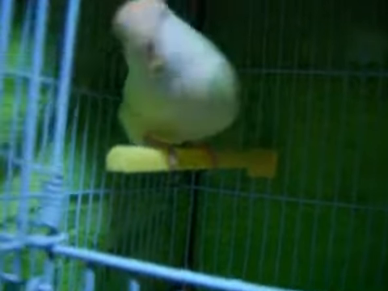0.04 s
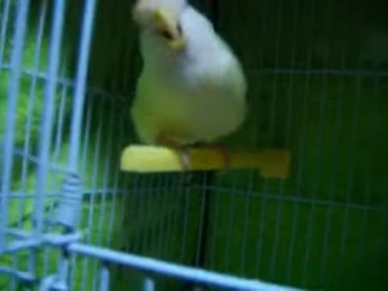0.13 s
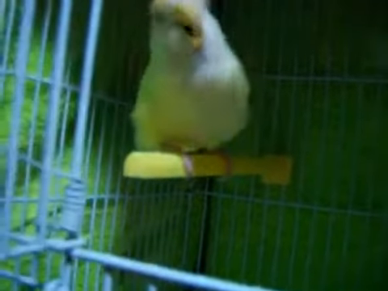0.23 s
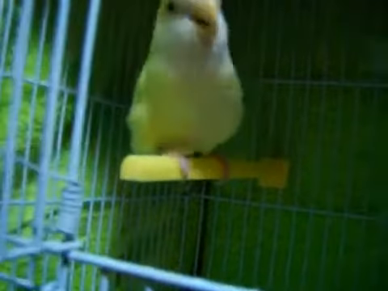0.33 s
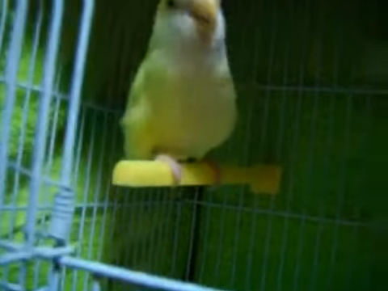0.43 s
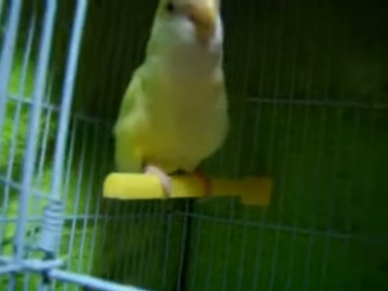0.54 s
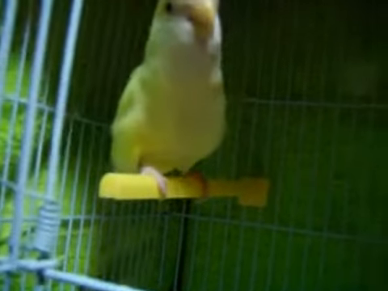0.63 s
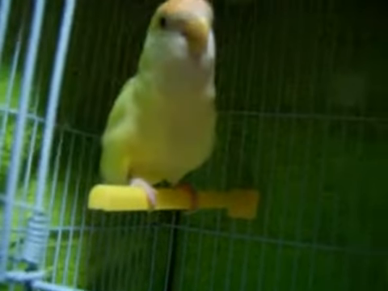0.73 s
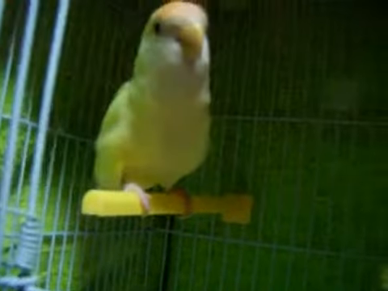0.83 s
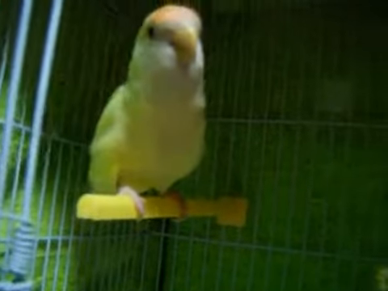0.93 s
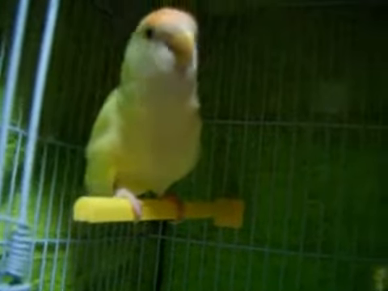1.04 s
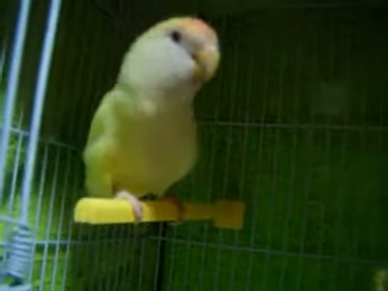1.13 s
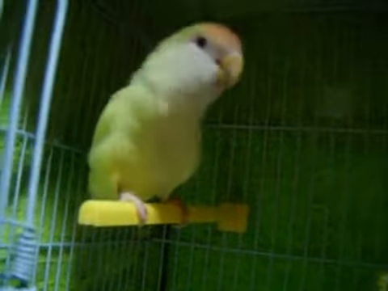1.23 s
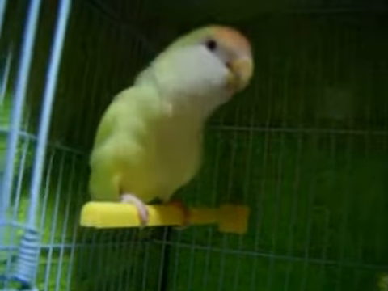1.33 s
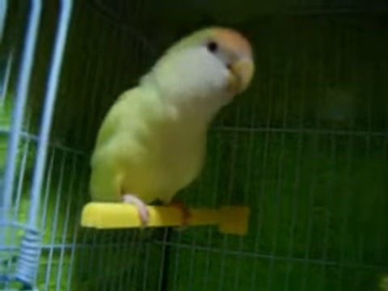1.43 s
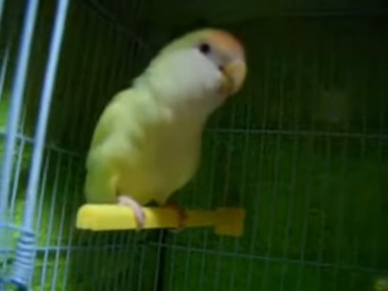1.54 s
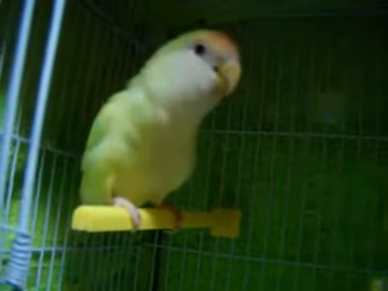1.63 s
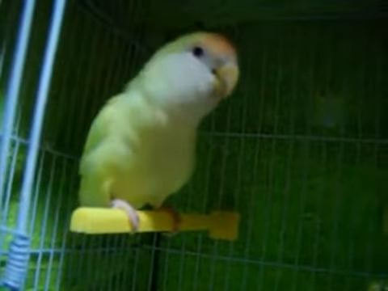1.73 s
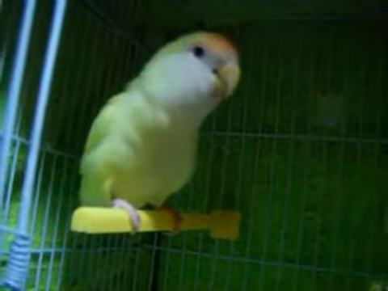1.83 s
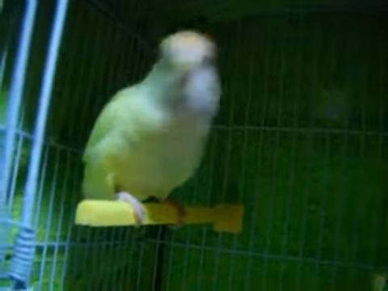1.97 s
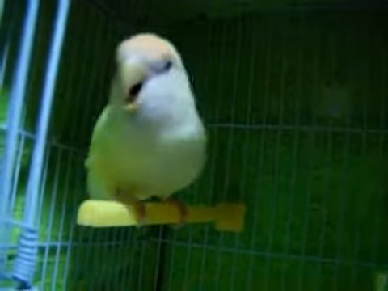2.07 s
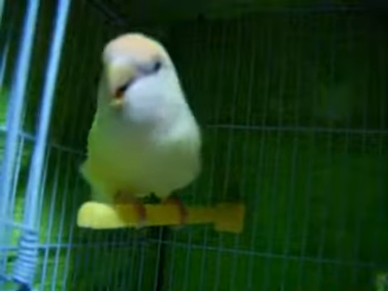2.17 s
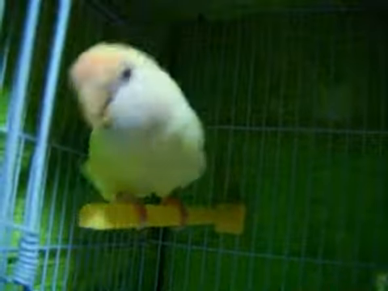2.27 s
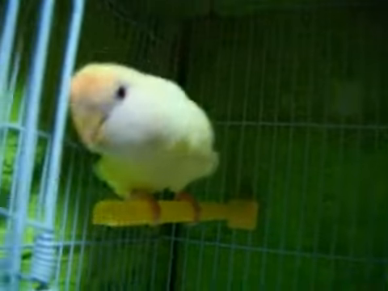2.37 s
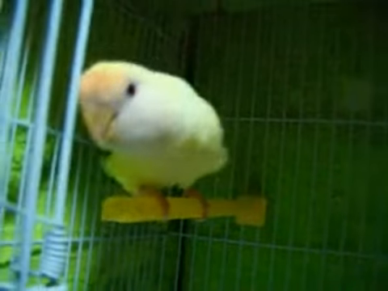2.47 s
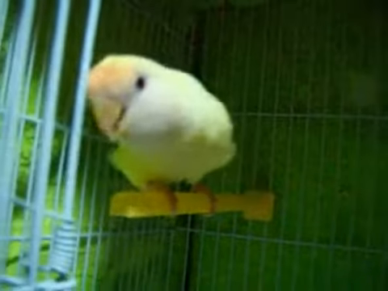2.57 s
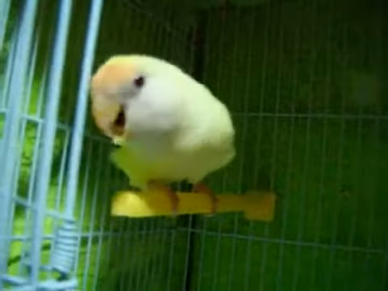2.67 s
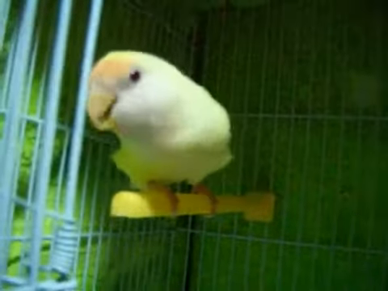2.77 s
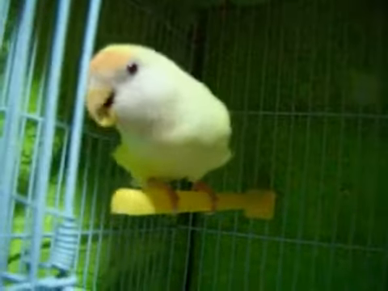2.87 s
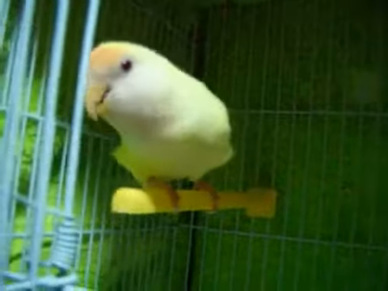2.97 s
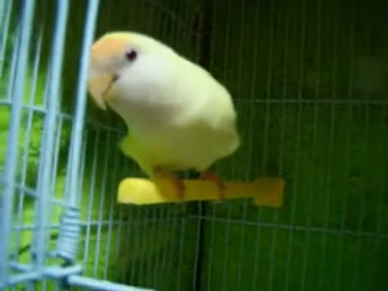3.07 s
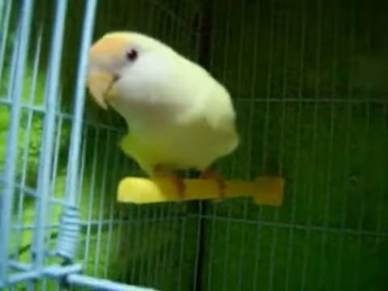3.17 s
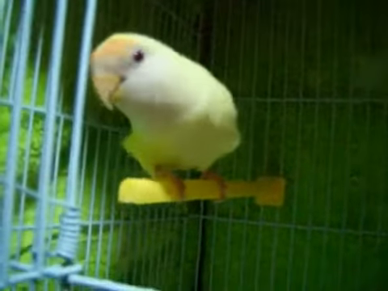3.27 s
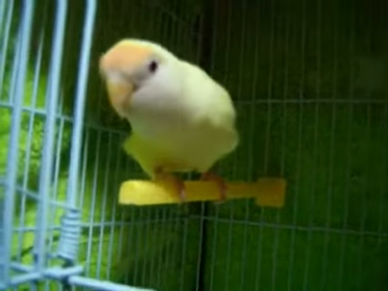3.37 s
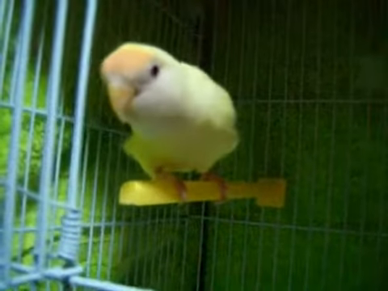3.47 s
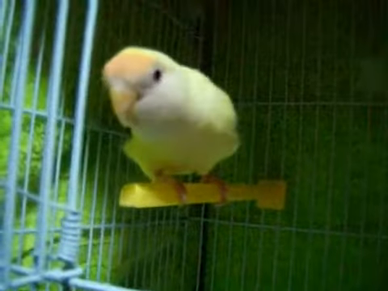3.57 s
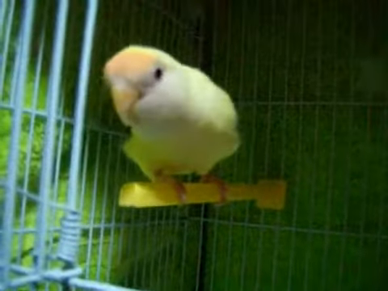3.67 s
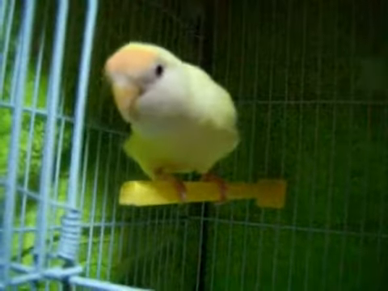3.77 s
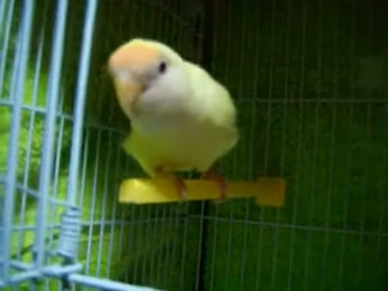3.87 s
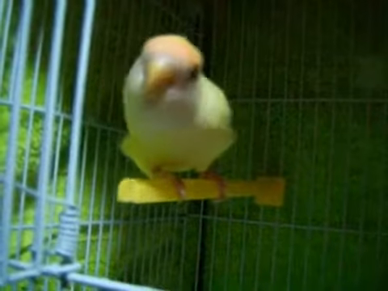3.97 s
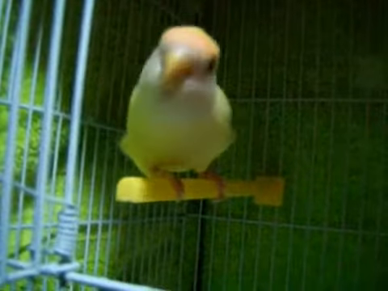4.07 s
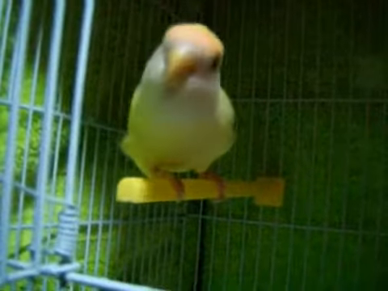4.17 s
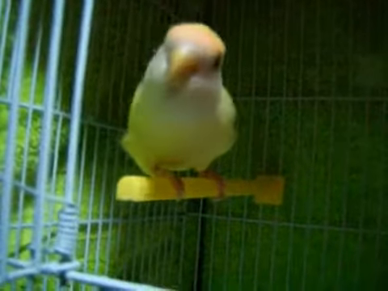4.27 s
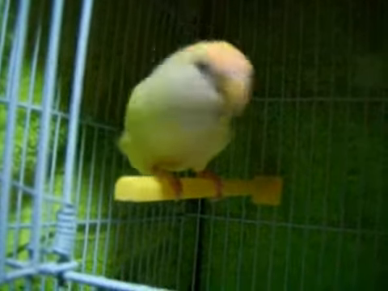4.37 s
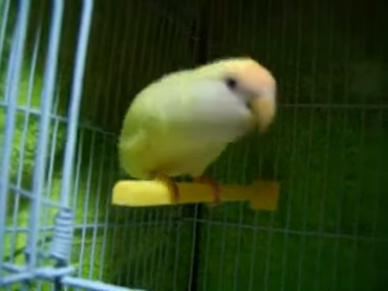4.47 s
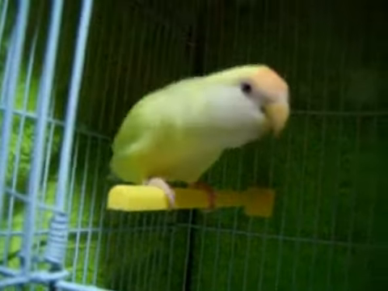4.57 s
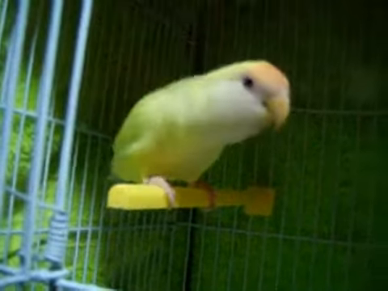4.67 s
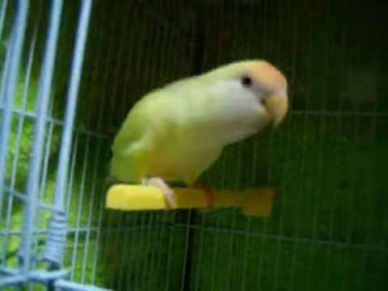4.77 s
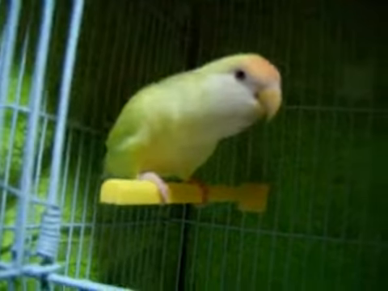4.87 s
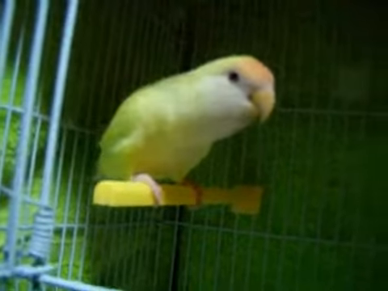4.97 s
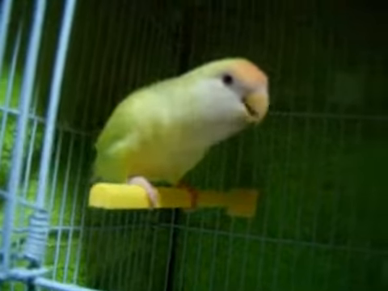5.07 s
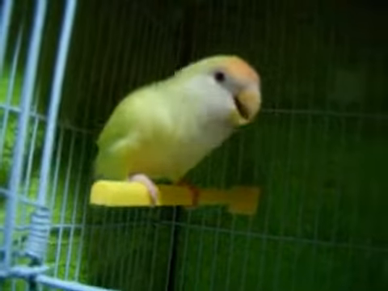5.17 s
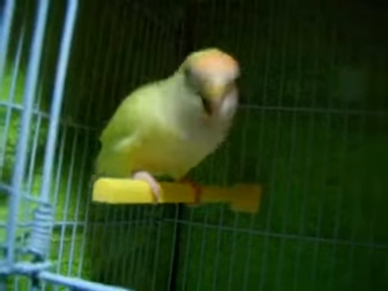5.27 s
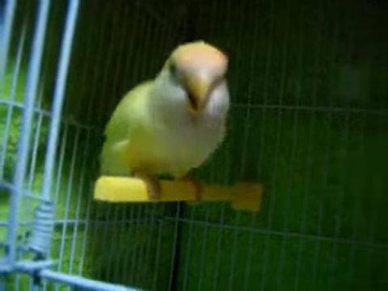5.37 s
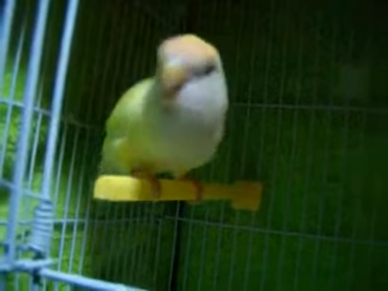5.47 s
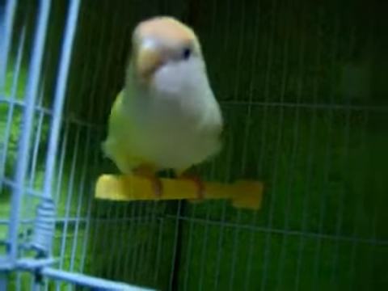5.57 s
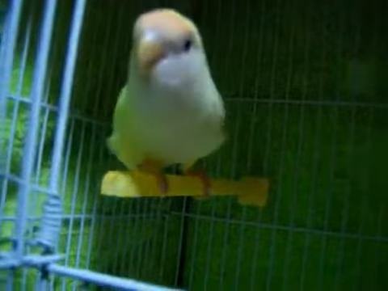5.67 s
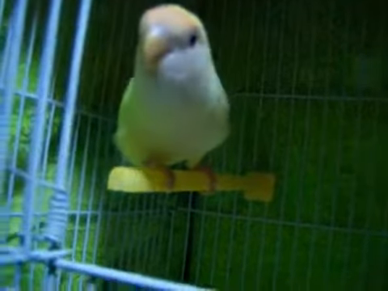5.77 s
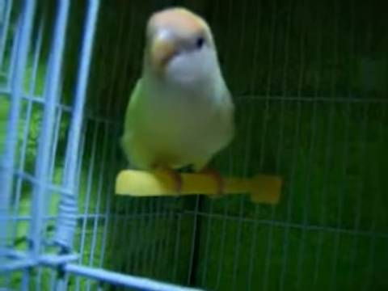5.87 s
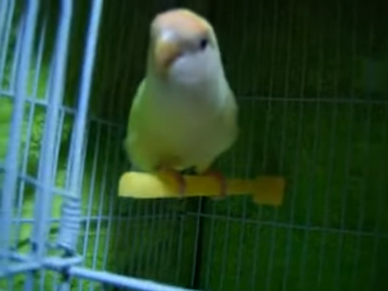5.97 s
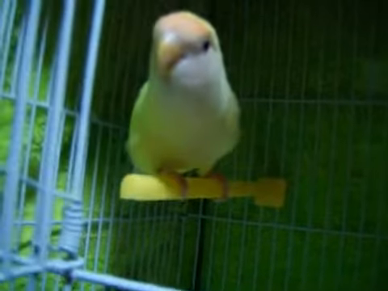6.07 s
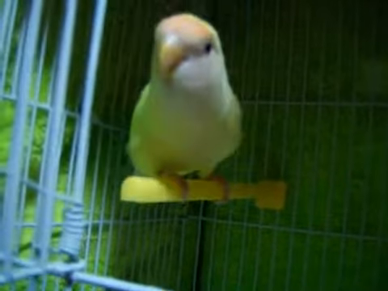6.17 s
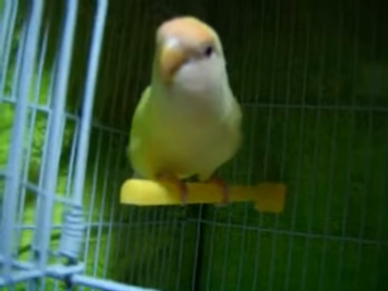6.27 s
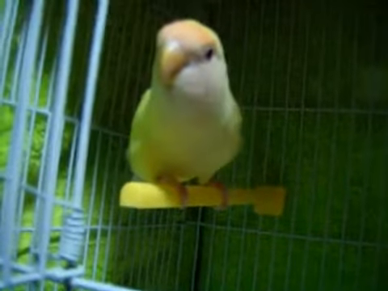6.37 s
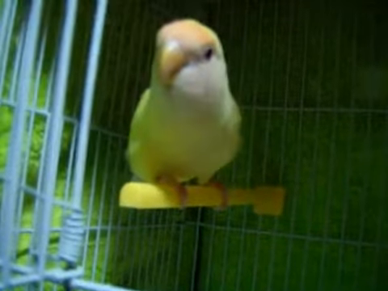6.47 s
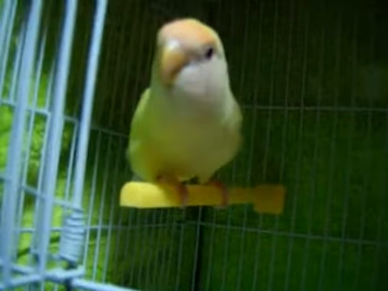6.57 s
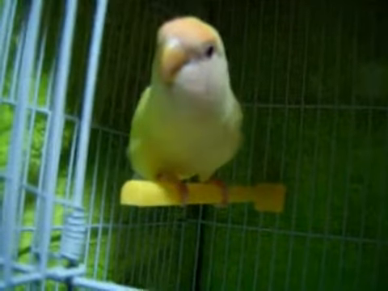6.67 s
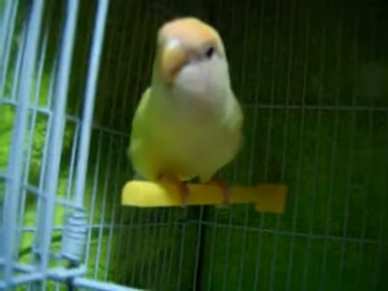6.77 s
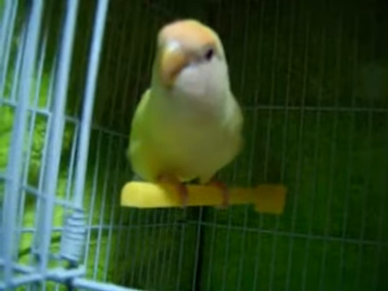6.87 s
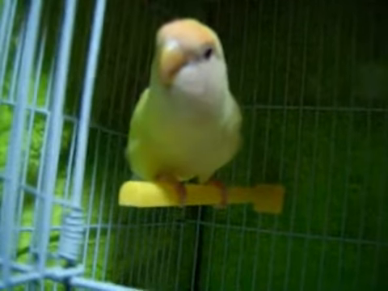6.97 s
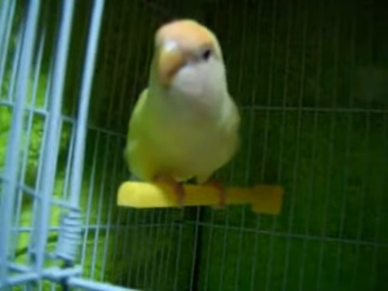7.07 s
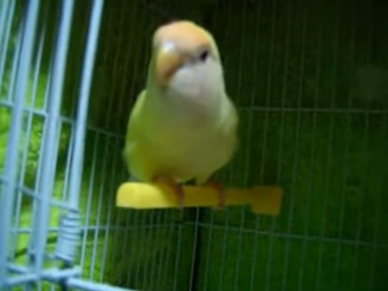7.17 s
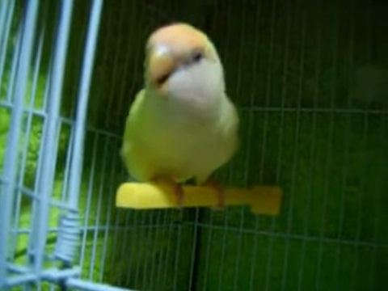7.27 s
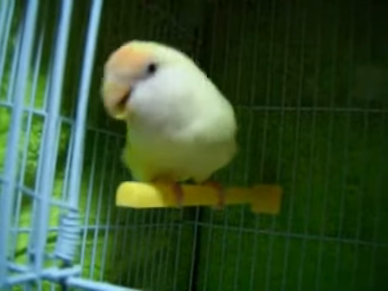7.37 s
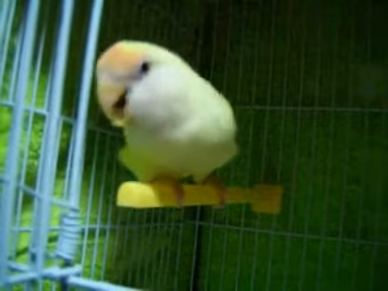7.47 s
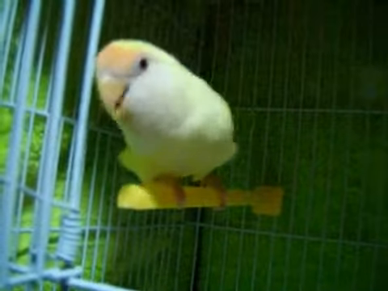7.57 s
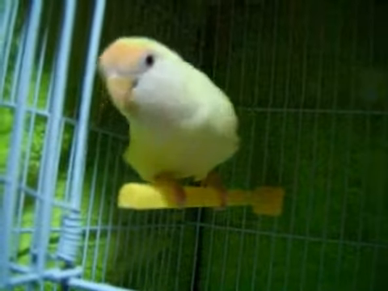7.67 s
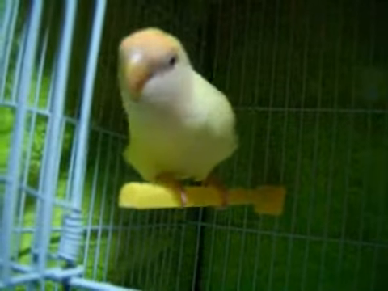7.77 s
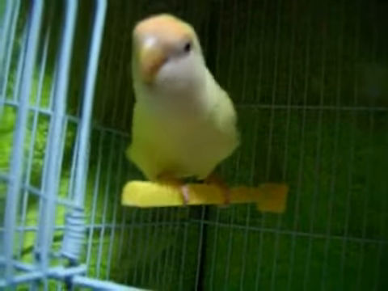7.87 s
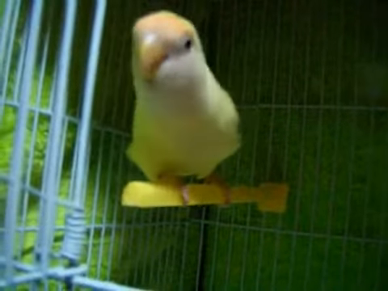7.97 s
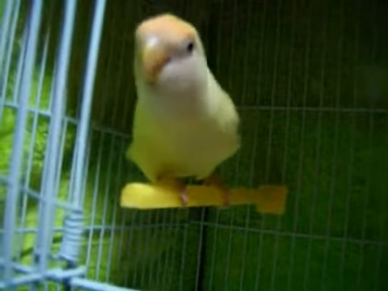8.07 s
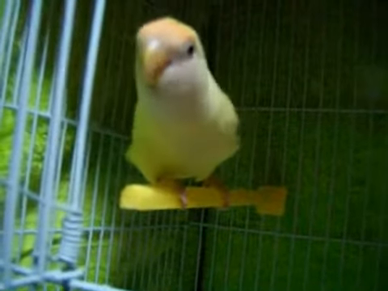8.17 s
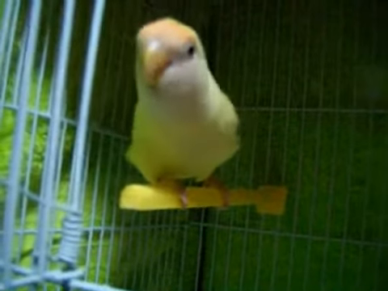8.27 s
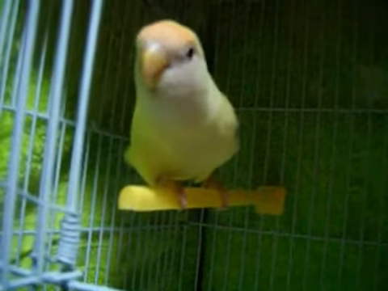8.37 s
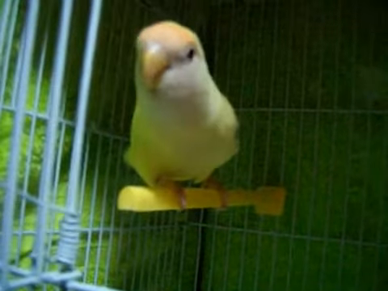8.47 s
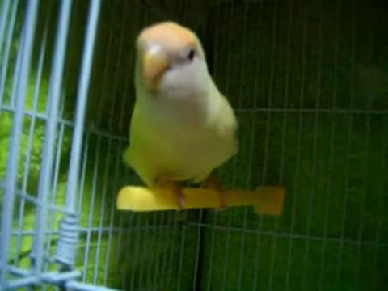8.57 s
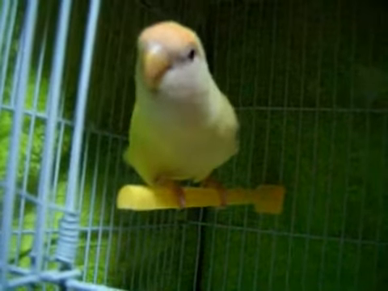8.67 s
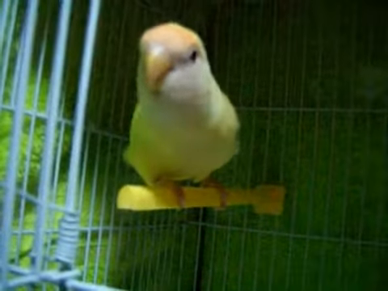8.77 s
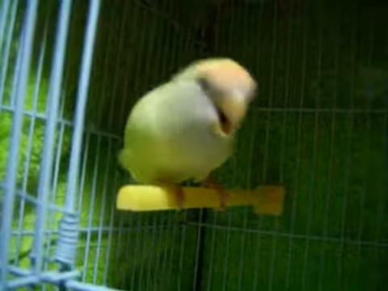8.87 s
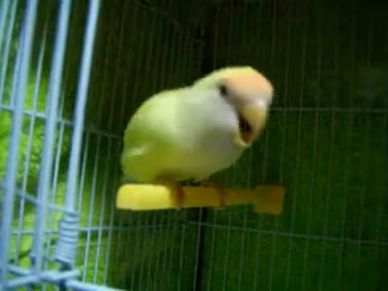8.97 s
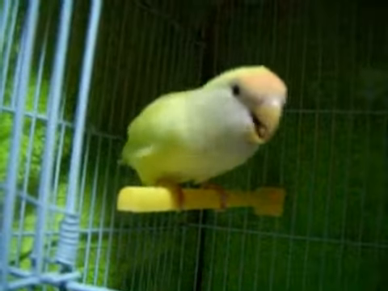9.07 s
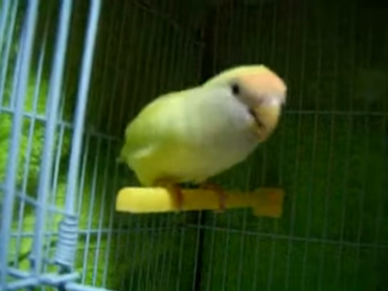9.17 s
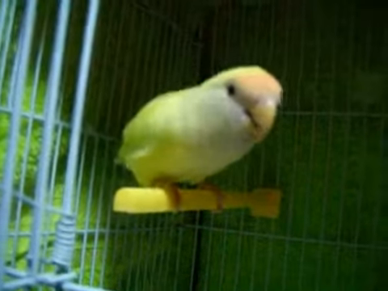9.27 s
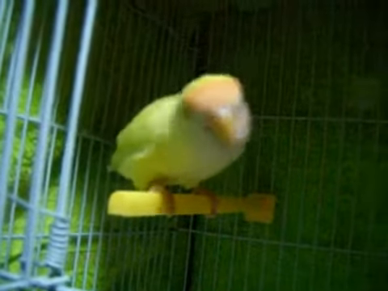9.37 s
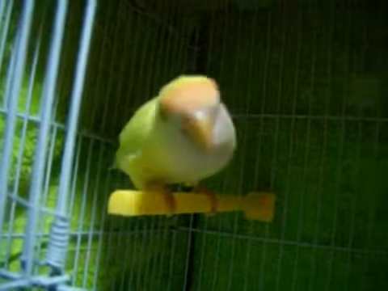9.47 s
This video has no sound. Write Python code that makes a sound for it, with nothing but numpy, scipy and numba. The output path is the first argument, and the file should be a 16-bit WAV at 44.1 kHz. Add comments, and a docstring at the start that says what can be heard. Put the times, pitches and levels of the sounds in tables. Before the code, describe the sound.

A small parrot gives loud, shrill, raspy screeches right by the microphone, often in quick doubles, while other birds answer faintly in a small room.

```python
"""A small parrot screeches a hand's breadth from a cheap microphone indoors: each screech is a chain of short
whistled notes that jump in pitch, joined by raspy breaks. A wavering tone with overtones makes each voice.
Two other birds answer from further off, blurred by echoes, and faint taps sound on the cage.
Under it lie shaped noise as microphone hiss, two thin electronic whines (sines) and one electrical pop.
The microphone cuts the treble steeply and a hard ceiling flattens the highest peaks."""
import sys
import numpy as np
from scipy import signal
from scipy.fft import rfft, irfft
from scipy.io import wavfile
from scipy.ndimage import uniform_filter1d
from numba import njit

SR = 44100
rng = np.random.default_rng(int(sys.argv[2]) if len(sys.argv) > 2 else 0)


def volts_from_db(level):
    """Convert decibel levels to linear amplitude ratios."""
    exponent = np.asarray(level, float) / 20
    return 10 ** exponent


def file_out(sig):
    """Save sig as 16-bit WAV at sys.argv[1]."""
    # one column per channel
    cols = np.atleast_2d(sig).T
    # limit, then scale
    lim = np.clip(cols, -1, 1)
    pcm = np.round(lim * 32767).astype(np.int16)
    wavfile.write(sys.argv[1], SR, pcm)


N = 419391  # length in samples
TOP_HZ = 10860  # the microphone passes nothing much above this

# The near bird's screeches, one line each; a syllable lasts until the next, the last entry is the end time [s]:
# (time [s], syllable, start pitch [Hz], level [dB])
SCREECH_SYLLABLES = [ ((0.0, "rise", 2550, -8), (.027, "sag", 4580, -5.5), (.037, "hoarse", 6280, -15.5),
                     (.044, "plunge", 6500, -18.5), (.049, "hold", 3620, -22.5), (.089, "sag", 5270, -22),
                     (.096, "hoarse", 3250, -20), .108), ((.137, "scoop", 2050, -14),
                     (.146, "rise", 4150, -7), (.165, "up", 5900, -18), (.171, "plunge", 5500, -21.5),
                     (.177, "low", 2340, -17), (.217, "hoarse", 3910, -19.5), (.227, "drop", 6200, -12.5),
                     (.236, "plunge", 4500, -25), .246), ((1.927, "fall", 2270, -16),
                     (1.945, "fall", 1990, -29.5), (1.962, "scoop", 1550, -27), (1.974, "rise", 2400, -10),
                     (2.018, "rise", 2600, -10), (2.028, "up", 4170, -9.5), (2.042, "sag", 4530, -10),
                     (2.056, "fall", 4170, -14), (2.075, "hold", 3620, -12), 2.121),
                     ((2.577, "up", 4070, -19), (2.6, "low", 2446, -9), (2.631, "hoarse", 4120, -14.5),
                     (2.638, "up", 5360, -11.5), (2.645, "drop", 6080, -10.5), (2.653, "hold", 3510, -15),
                     (2.695, "sag", 5090, -16.5), (2.702, "fall", 3160, -12), 2.711),
                     ((2.74, "scoop", 2000, -15.5), (2.747, "hold", 4000, -11), (2.77, "plunge", 5650, -16),
                     (2.78, "low", 2330, -12), (2.82, "sag", 3900, -15.5), (2.834, "drop", 5630, -14),
                     (2.849, "fall", 3260, -15.5), 2.856), ((5.073, "scoop", 1900, -19),
                     (5.081, "leap", 4100, -8), (5.094, "hoarse", 4400, -19), (5.107, "hold", 5830, -15.5),
                     (5.124, "hoarse", 3570, -29), (5.142, "low", 3580, -18), (5.155, "leap", 4100, -12),
                     (5.163, "drop", 5050, -18), 5.175), ((5.2, "scoop", 1930, -15.5),
                     (5.213, "hold", 3900, -14), (5.225, "fall", 3560, -12), (5.25, "up", 3230, -15.5),
                     (5.27, "up", 3700, -23.5), (5.279, "hold", 4110, -9.5), (5.297, "fall", 3810, -13),
                     (5.321, "hold", 2260, -15), (5.352, "rise", 3330, -14.5), 5.392),
                     ((7.227, "sag", 4630, -15.5), (7.239, "fall", 2640, -10.5),
                     (7.262, "hoarse", 2790, -12), (7.275, "sag", 4320, -13), (7.292, "up", 5550, -12.5),
                     (7.302, "sag", 5800, -12), (7.313, "hold", 3590, -12), (7.344, "drop", 5700, -13.5),
                     (7.352, "hoarse", 3120, -12.5), 7.362), ((7.391, "scoop", 1920, -15.5),
                     (7.4, "rise", 4060, -9), (7.415, "up", 5300, -8.5), (7.422, "drop", 5950, -10.5),
                     (7.43, "hoarse", 3650, -17.5), (7.444, "low", 2280, -11), (7.466, "hold", 3790, -13.5),
                     (7.483, "up", 5270, -12.5), (7.489, "sag", 5580, -12.5), (7.497, "fall", 3320, -16.5),
                     7.502), ((8.798, "dip", 2350, -18), (8.822, "rise", 1770, -26),
                     (8.845, "scoop", 1600, -18.5), (8.851, "rise", 2370, -13.5),
                     (8.886, "low", 2480, -12.5), (8.901, "hoarse", 4410, -10.5),
                     (8.927, "fall", 4220, -12.5), (8.946, "fall", 3770, -12.5), (8.965, "drop", 5330, -18),
                     (8.983, "hold", 3500, -19.5), 8.998), ]


def near_parrot():
    """The main bird: chains of syllables sung by a mostly clear voice."""
    control = notes(SCREECH_SYLLABLES, dip_db=-3.5, edge_s=0.0031)
    return voice(control, tilt_db=-1.6, dulling=0.022, jitter=.027, spread_hz=720.0,
                 half_db=-10.5, breath_db=-7.0, flutter_db=1.7)


# How each syllable of the near bird moves, from clear whistles through husky notes to raspy breaks:
# name: (end pitch / start pitch, rasp share [dB])
SYLLABLE_SHAPES = { "low": (1.17, -23.5), "rise": (1.07, -22), "hold": (.96, -22), "fall": (.89, -20),
                   "dip": (.76, -20), "scoop": (1.5, -12), "hoarse": (1.01, -10), "sag": (.91, -8),
                   "up": (1.09, -5), "leap": (1.6, -7), "drop": (.81, -6), "plunge": (.64, -7), }
# after each screech a faint tone lingers and fades near 3.6 kHz
TRAIL_HZ, TRAIL_DB, TRAIL_DB_PER_S, TRAIL_RASP_DB, TRAIL_S = 3600, -33, -250, -12, .08
ACCENT_DB = 1.2  # each syllable starts this much above its level and ends as much below
SAG_POWER = 1.8  # how much the low register's glides are bent


def notes(calls, dip_db, edge_s):
    """Pitch, gain and rasp of syllable chains: the pitch breaks at each join and the level dips there."""
    hz, gain, rasp_db = np.full(N, 1. * calls[0][0][2]), np.zeros(N), np.zeros(N)
    trail_t = np.arange(int(TRAIL_S * SR)) / SR
    for call in calls:
        ends = [row[0] for row in call[1:-1]] + [call[-1]]
        for (s, name, from_hz, db), until in zip(call, ends):
            glide, share_db = SYLLABLE_SHAPES[name]
            to_hz = glide * from_hz
            a, b = int(s * SR), int(until * SR)
            hz[a:], rasp_db[a:] = to_hz, share_db
            # notes of the low register sag: they rise late and fall early
            low = max(from_hz, to_hz) < 3300
            bend = SAG_POWER ** np.sign(to_hz - from_hz) if low else 1
            hz[a:b] = from_hz + (to_hz - from_hz) * np.linspace(0, 1, b - a) ** bend
            along = np.linspace(-1, 1, b - a)
            gain[a:b] = volts_from_db(db + dip_db * along ** 4 - ACCENT_DB * along)
        hz[b:], rasp_db[b:] = TRAIL_HZ, TRAIL_RASP_DB
        gain[b:b + len(trail_t)] = volts_from_db(TRAIL_DB + TRAIL_DB_PER_S * trail_t)
    return hz, slur(gain, edge_s), rasp_db


# Windpipe and beak make some pitches louder than others: (frequency [Hz], relative level [dB])
THROAT_RESPONSE = [(1500, -18.5), (2400, -8.5), (3400, 2), (5000, 0.5), (6200, 2), (7400, -9.5),
                   (9000, -12), (11000, -20)]


def voice(control, tilt_db, dulling, jitter, spread_hz, half_db, breath_db, flutter_db):
    """A membrane tone with overtones; where it rasps the cycles scatter, period doubling and air noise join in."""
    hz, gain, rasp_db = control
    rasp = volts_from_db(np.minimum(rasp_db, 0)) ** 2  # share of the power, 0 to 1
    # a gentle, clear call is poorer in overtones than a forced one; the tilt is in dB per octave
    tilt_db = tilt_db + dulling * rasp_db
    shaky_hz = hz * (1 + jitter * rasp ** .25 * wobble(160.))
    phase = 2 * np.pi * np.cumsum(shaky_hz) / SR
    scatter = wobble(spread_hz) + 1j * wobble(spread_hz)
    doubling = wobble(150.0)
    tone, power = 0, 0
    for k in range(1, 6):
        audible = k * hz < 1.1 * TOP_HZ
        partial_gain = volts_from_db(on_log(k * hz, THROAT_RESPONSE) + tilt_db * np.log2(k)) * audible
        # scattered cycles smear each partial into a band, the upper ones more
        share = 1 - (1 - rasp) ** k
        blur = np.sqrt(1 - share) + np.sqrt(share / 2) * np.roll(scatter, 999 * k)
        # each partial also flickers on its own as the beak moves
        blur = blur * volts_from_db(.7 * k * np.roll(doubling, 777 * k))
        tone = tone + partial_gain * np.real(blur * np.exp(1j * k * phase))
        # strong-weak cycles add lines half-way between
        half = volts_from_db(half_db + on_log((k - .5) * hz, THROAT_RESPONSE) + tilt_db * np.log2(k))
        tone = tone + np.sqrt(rasp) * half * doubling * np.sin((k - .5) * phase)
        power = power + partial_gain ** 2 / 2
    air = volts_from_db(breath_db) * rasp ** .7 * colour(THROAT_RESPONSE + [(12000, -60)])
    flutter = volts_from_db(flutter_db * wobble(150.))
    out = gain * flutter * (tone / np.sqrt(power) + air)
    # so small a body radiates no bass
    return signal.sosfilt(signal.butter(3, 1300., "high", fs=SR, output="sos"), out)


def on_log(hz, table):
    """Reads a (frequency [Hz], level [dB]) table, straight on a log-frequency axis."""
    f, db = np.transpose(table)
    return np.interp(np.log(hz), np.log(f), db)


def wobble(hz):
    """Slow random movement: noise low-passed at hz, of spread 1."""
    low_pass = signal.butter(3, hz, fs=SR, output="sos")
    x = signal.sosfilt(low_pass, rng.standard_normal(N))
    return x / x.std()


def colour(table):
    """Noise with the given spectrum, rms 1."""
    hz = np.arange(1, N // 2 + 2) * SR / N
    spectrum = rfft(rng.standard_normal(N)) * volts_from_db(on_log(hz, table))
    x = irfft(spectrum, N)
    return x / x.std()


def slur(x, s):
    """Rounds steps off over about s seconds by averaging twice."""
    k = max(int(s * SR), 1)
    return uniform_filter1d(uniform_filter1d(x, k), k)


# The far birds' calls; the two birds take turns, row by row:
# (time [s], length [s], call, start pitch [Hz], level before distance [dB])
ANSWER_CALLS = [ (.3, .09, "squawk", 3150, -31.5), (.4, .1, "peep", 1220, -54.5),
                (1.08, .08, "climb", 1897, -63), (2.27, .1, "slide", 2300, -35),
                (2.275, .08, "slide", 4650, -34), (2.37, .06, "pipe", 3049, -37.5),
                (2.36, .065, "slide", 4050, -32), (2.42, .12, "croak", 2430, -33),
                (2.435, .105, "croak", 3150, -33), (2.98, .05, "build", 3150, -49),
                (4.17, .28, "swell", 2650, -50), (4.53, .09, "dive", 3400, -60),
                (4.62, .08, "climb", 1850, -61), (5.44, .05, "harsh", 2550, -37),
                (5.548, .052, "harsh", 3080, -34), (6.195, .06, "build", 2400, -40.5),
                (6.979, .075, "climb", 1643, -42), (6.975, .085, "pipe", 3298, -45),
                (7.05, .09, "pipe", 2419, -41.5), (7.055, .1, "pipe", 3380, -35),
                (7.155, .07, "build", 2150, -32), (7.61, .04, "harsh", 3200, -45.5),
                (7.717, .25, "pipe", 1510, -56), (7.88, .085, "peep", 1240, -55),
                (8.7, .04, "peep", 2320, -57), (9.093, 0.057, "peep", 1490, -54),
                (9.208, 0.0352, "peep", 3050, -60), ]


def far_birds():
    """Two birds further off, with the same kind of voice but more breath and period doubling."""
    return sum(voice(sweeps(bird, edge_s=.015), tilt_db=-1.5, dulling=.9, jitter=0.025, spread_hz=380.,
                     half_db=-4.5, breath_db=-1.0, flutter_db=1.399)
               for bird in (ANSWER_CALLS[::2], ANSWER_CALLS[1::2]))


# How each far call moves:
# name: (end pitch / start pitch, rasp share [dB], first level and last level against the middle [dB])
FAR_CALL_SHAPES = {"squawk": (1.35, 1.5, -4, -9), "harsh": (0.85, 3, 0.5, -2.5),
                   "slide": (0.92, -3.5, -4, -2.5), "swell": (1, 0.5, -10.5, -8),
                   "build": (1.23, 1.5, -5.5, 4), "dive": (.45, -14, 3, -3), "climb": (1.47, -7, -6.5, 5.5),
                   "pipe": (1.0, -9, -3, -1), "peep": (1, -32, 0.5, -3.5), "croak": (1.2, -3.5, -3.5, -8)}


def sweeps(calls, edge_s):
    """Pitch, gain and rasp of calls that glide while their level swells or fades."""
    hz, gain, rasp_db = np.full(N, 1. * calls[0][3]), np.zeros(N), np.zeros(N)
    for s, length, name, from_hz, db in calls:
        glide, share_db, first_db, last_db = FAR_CALL_SHAPES[name]
        a, along = int(s * SR), np.linspace(0, 1, int(length * SR))
        b = a + len(along)
        hz[a:], rasp_db[a:] = glide * from_hz, share_db
        hz[a:b] = from_hz * glide ** along
        gain[a:b] = volts_from_db(db + np.interp(along, (0, .5, 1), (first_db, 0, last_db)))
    return hz, slur(gain, edge_s), rasp_db


# Faint taps on the cage: (time [s], starting level before filter and distance [dB])
CAGE_TAPS = [(0.746, -34), (8.098, -47)]


def taps():
    """Short dull ticks of claw or beak: fading noise plus a fading tone as the perch rings briefly."""
    out, t = np.zeros(N), np.arange(int(.06 * SR)) / SR
    for s, db in CAGE_TAPS:
        a = int(s * SR)
        tick = np.exp(-t / 0.019) * rng.standard_normal(len(t))
        ring = 0.32 * np.exp(-t / 0.017) * np.sin(2 * np.pi * 880. * t)
        out[a:a + len(t)] += volts_from_db(db) * (tick + ring)
    return signal.sosfilt(signal.butter(2, [700, 6000], "band", fs=SR, output="sos"), out)


def nearby(x, last_s, db):
    """Scattered first reflections from the surfaces around the cage: 12 delayed copies of random size."""
    out = np.zeros(N)
    for s, size in rng.uniform((.008, -1), (last_s, 1), size=(12, 2)):
        k = int(s * SR)
        out[k:] += size * x[:-k]
    return volts_from_db(db) * out


ROOM_T60_S, ROOM_DAMP = 0.47, 0.32  # time to fade by 60 dB before damping; treble lost on each round (0 to 1)


def room(x):
    """Echoes between the walls: each delay loses level in proportion to its length."""
    lags = rng.integers(300, 1600, size=8)  # samples
    return walls(x, lags, volts_from_db(-60 * lags / SR / ROOM_T60_S), ROOM_DAMP)


@njit
def walls(x, lags, gain, damp):
    """Eight delay lines that feed each other, duller on every round."""
    line, soft, out = np.zeros((8, 4096)), np.zeros(8), np.zeros(len(x))
    for i in range(len(x)):
        total = 0.
        for k in range(8):
            soft[k] += (1 - damp) * (gain[k] * line[k, (i - lags[k]) & 4095] - soft[k])
            total += soft[k]
            out[i] += soft[k] * (1 - 2 * (k % 2))  # alternate signs
        for k in range(8):
            line[k, i & 4095] = x[i] + soft[k] - total / 4
    return out


# The electrical pop: (time [s], length [s], level before the high-pass [dB])
ELECTRICAL_POP = (6.6470, .0005, -16)


def pop():
    """A square pulse that sags through the coupling capacitor, a gentle high-pass."""
    t = np.arange(N) / SR
    s, length, db = ELECTRICAL_POP
    pulse = volts_from_db(db) * ((t > s) & (t < s + length))
    return signal.lfilter(*signal.butter(1, 60., "high", fs=SR), pulse)


# Thin electronic whines: (frequency [Hz], rms level [dB])
WHINE_TONES = [(7300, -78), (8080, -65.5)]


def whines():
    """Steady sine tones from the electronics."""
    t = np.arange(N) / SR
    return sum(volts_from_db(db) * np.sqrt(2) * np.sin(2 * np.pi * f * t) for f, db in WHINE_TONES)


# Spectrum of the microphone hiss: (frequency [Hz], relative level per Hz [dB])
HISS_SPECTRUM = [(24, -29), (40, -0.5), (227, -2), (6220, -13.5), (7860, -9), (10900, -18.5), (14200, -47),
                 (22000, -120)]
HISS_DB = -57  # rms


def hiss():
    """Steady microphone hiss: noise shaped to a spectrum."""
    return volts_from_db(HISS_DB) * colour(HISS_SPECTRUM)


def scene():
    """The near bird is mostly direct sound, the far ones mostly room."""
    near = near_parrot()
    far = far_birds() + taps()
    # the tiny constant keeps the echo sums from becoming vanishingly small
    echoes = room(volts_from_db(-27) * near + volts_from_db(-16.5) * far + 1e-18)
    direct = near + nearby(near, last_s=0.055, db=-35.5) + volts_from_db(-3.0) * far
    return (direct + echoes + hiss() + whines() + pop())[None]


def roll_off(x):
    """The treble ends steeply here."""
    return signal.sosfilt(signal.butter(12, 11070, fs=SR, output="sos"), x)


LOPSIDED = .004  # share of the squared signal that the microphone adds


def record(dry):
    """A narrow-band recorder: a slightly lopsided microphone, steep treble cut, then a hard ceiling."""
    bent = dry + LOPSIDED * dry ** 2
    cut = signal.sosfilt(signal.ellip(8, .5, 60, TOP_HZ, fs=SR, output="sos"), bent)
    return roll_off(np.clip(cut, -1, 1))


dry = scene()
out = record(dry)
file_out(out)
```